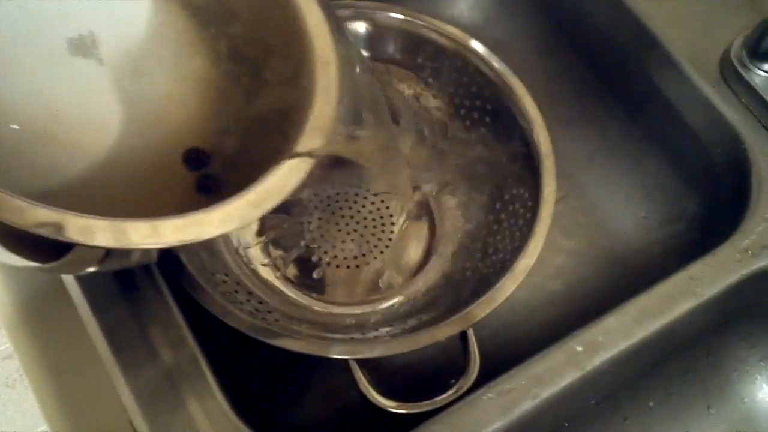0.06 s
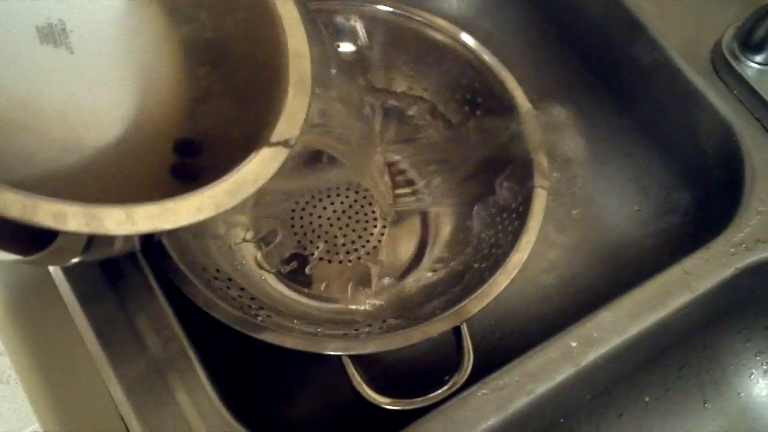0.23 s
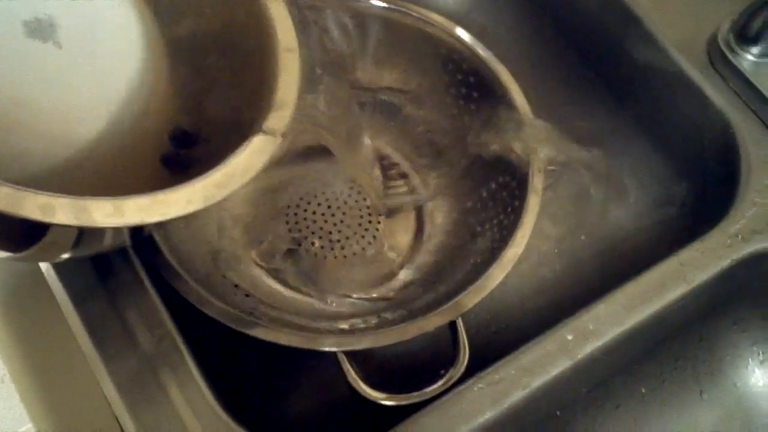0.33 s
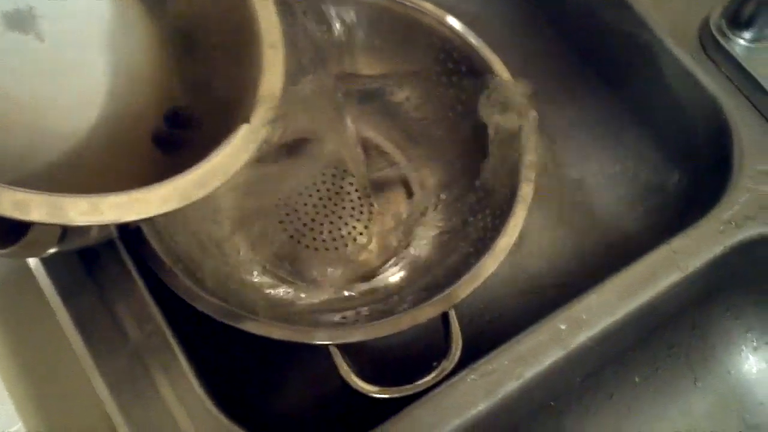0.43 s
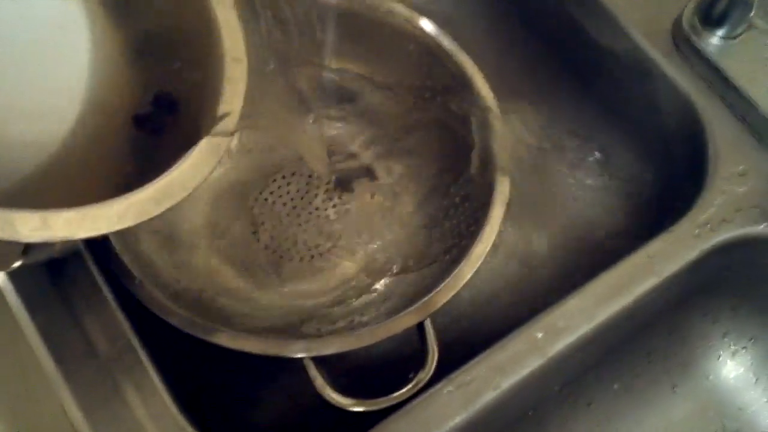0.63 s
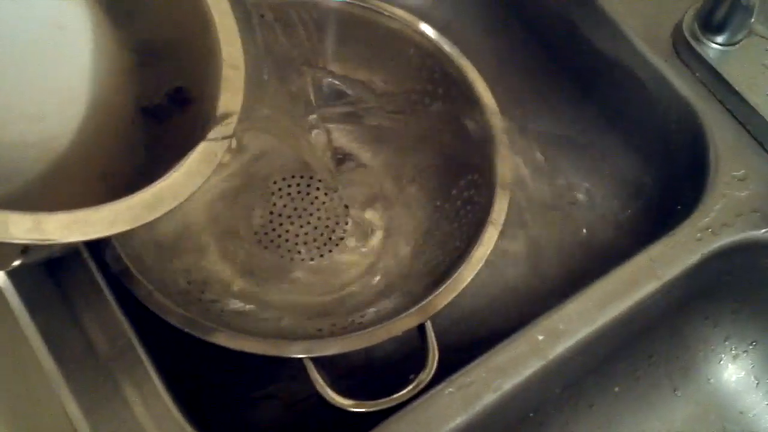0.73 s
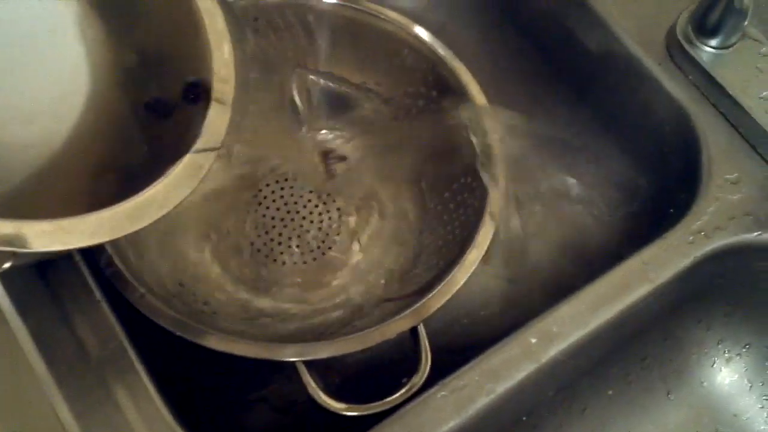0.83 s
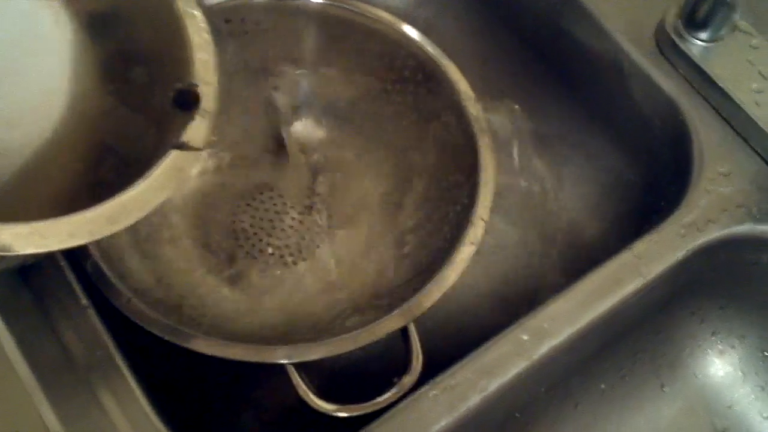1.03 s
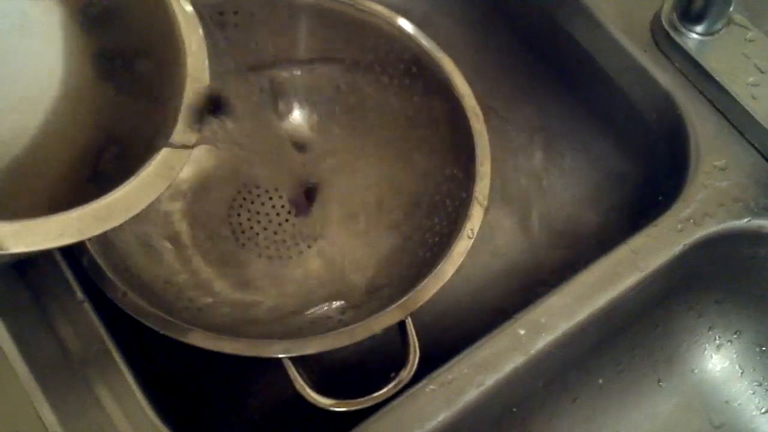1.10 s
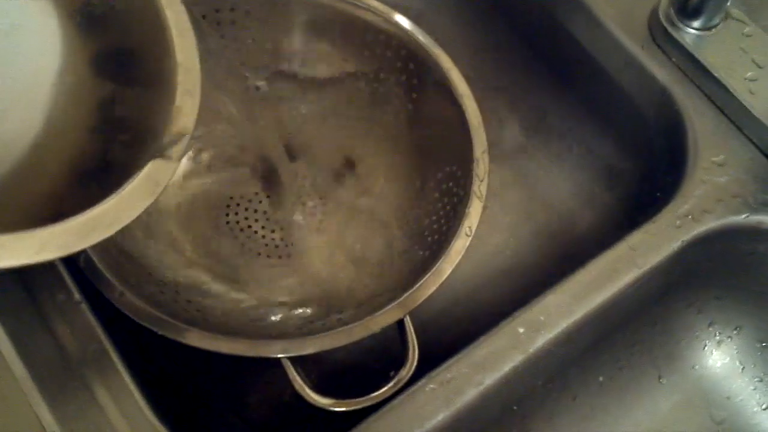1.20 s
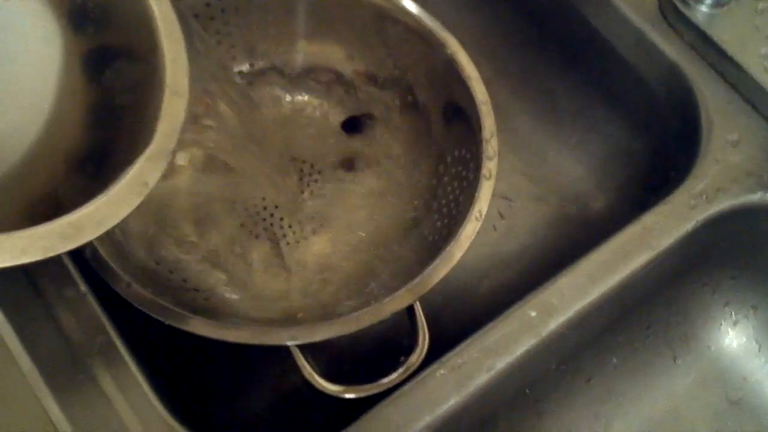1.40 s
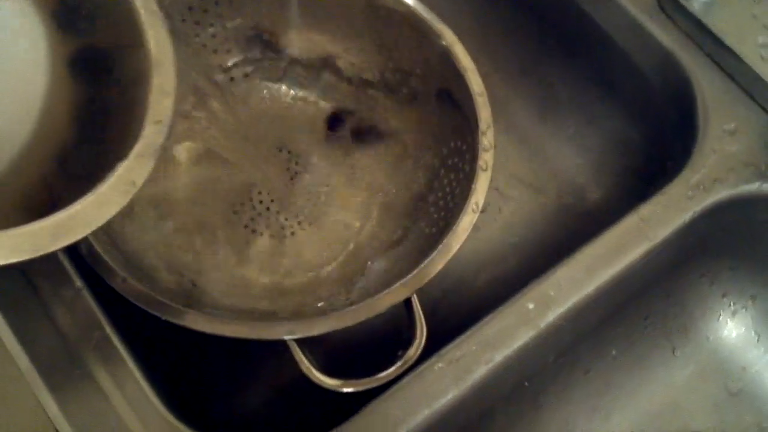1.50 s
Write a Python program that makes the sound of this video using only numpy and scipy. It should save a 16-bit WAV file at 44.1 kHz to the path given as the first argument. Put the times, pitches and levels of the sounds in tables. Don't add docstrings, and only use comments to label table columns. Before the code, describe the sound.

Water pours from a bowl into a metal colander in a steel sink, hissing and splashing brightly, then gurgling and drumming lower; two small berries knock the metal late. Close stereo microphone in a kitchen.

```python
import sys
import numpy as np
from scipy import signal
from scipy.fft import rfft, irfft, next_fast_len
from scipy.io import wavfile

SR = 44100
rng = np.random.default_rng(int(sys.argv[2]) if len(sys.argv) > 2 else 0)


def wav_record(signal):
    frames = np.transpose(np.atleast_2d(signal))
    bounded = np.clip(frames, -1, 1)
    quanta = np.round(bounded * 32767).astype(np.int16)
    wavfile.write(sys.argv[1], SR, quanta)


def to_linear_factor(level_db):
    exponent = np.asarray(level_db, float) / 20
    return 10 ** exponent


N = 68355
TIME_S = np.arange(N) / SR


def rms_one(x):
    return x / np.sqrt(np.mean(x ** 2) + 1e-20)


def at_hz(points, hz, axis=1):
    p = np.array(points)
    return np.interp(np.log(hz), np.log(p[:, 0]), p[:, axis])


def butter(x, order, hz, kind):
    return signal.sosfilt(signal.butter(order, hz, kind, fs=SR, output="sos"), x)


def drift(rate_hz):
    pole = np.exp(-80 * np.pi * rate_hz / SR)
    noise = rng.standard_normal(N // 40 + 2002)
    slow = signal.lfilter([1], [1, -2 * pole, pole * pole], noise)[2000:]
    return np.interp(np.arange(N) / 40, np.arange(len(slow)), rms_one(slow))


def ring(clicks, hz, t60_s):
    radius = to_linear_factor(-60 / (max(t60_s, 1e-4) * SR))
    w = 2 * np.pi * hz / SR
    return signal.lfilter([0, np.sin(w)], [1, -2 * radius * np.cos(w), radius * radius], clicks + 1e-18)


def shape(start_s, rise_s, t60_s):
    t = np.maximum(TIME_S - start_s + rise_s, 0)
    return t, (1 - np.exp(-t / rise_s)) * to_linear_factor(-60 * t / max(t60_s, .005))


def hiss(spectrum, patchy_db, shared_db, rate_hz):
    out, together = 0, drift(rate_hz)
    lowest, highest = spectrum[0][0], spectrum[-1][0]
    edges = lowest * 2 ** np.arange(0, np.log2(highest / lowest) + .3, 1 / 3)
    white = rng.standard_normal((2, 2, N))
    for k, (low, high) in enumerate(zip(edges, edges[1:])):
        band = butter(white[k % 2], 2, [low, high], "band")
        level_db = at_hz(spectrum, np.sqrt(low * high))
        out = out + band * to_linear_factor(level_db + shared_db * together + patchy_db * drift(rate_hz))
    return rms_one(out)


def grains(spectrum, low_hz, high_hz, per_s, cycles):
    spread_db = 3.0
    sizes = to_linear_factor(spread_db * np.minimum(rng.exponential(1, N), 4)) * rng.choice([-1, 1], (2, N))
    born = rng.random(N) < per_s * to_linear_factor(5 * drift(15)) / SR
    dealt = rng.integers(0, 24, N)
    out = 0
    for k, hz in enumerate(np.geomspace(low_hz, high_hz, 24)):
        gain = to_linear_factor(at_hz(spectrum, hz)) * hz
        out = out + gain * ring(sizes * born * (dealt == k), hz, cycles / hz)
    return rms_one(out)


def struck(rows, level_db, rise_s, t60_s):
    out = 0
    for s, db, hz in rows:
        t, envelope = shape(s, rise_s, t60_s)
        phase = 2 * np.pi * hz * t
        out = out + to_linear_factor(db + level_db) * envelope * np.array([np.sin(phase), np.cos(phase)])
    return out


def rumble():
    # pitch_hz, density_db_per_hz
    rumble_colour = [(30, -33), (70, 5.5), (110, 15), (170, 2), (300, -25)]
    return to_linear_factor(-48.5) * hiss(rumble_colour, patchy_db=1.5, shared_db=-1.5, rate_hz=3.3)


def trickle():
    # pitch_hz, density_db_per_hz
    trickle_colour = [(450, 3.5), (1200, -8), (2500, -11.5), (6000, -5.5)]
    return to_linear_factor(-56) * hiss(trickle_colour, patchy_db=3.5, shared_db=1.5, rate_hz=12.0)


def berry(contacts, modes):
    contact_hz, lag_cycles = 2870, .6
    crack_db, crack_hz, crack_rise_s, crack_t60_s = -32.5, 1790, 0.0013, 0.16
    clicks = np.zeros(N)
    s, db = np.transpose(contacts)
    clicks[(s * SR).astype(int)] = to_linear_factor(db)
    pole = np.exp(-2 * np.pi * contact_hz / SR)
    clicks = signal.lfilter([1 - pole], [1, -pole], clicks)
    rings = 0
    for k, (hz, mode_db, t60_s) in enumerate(modes):
        late = np.roll(clicks, int(lag_cycles * SR / hz))
        rings = rings + to_linear_factor(mode_db) * ring(late, hz, t60_s) * np.array([[1], [(-1) ** k]])
    dull = rms_one(butter(rng.standard_normal((2, N)), 1, crack_hz, "low"))
    crack = sum(to_linear_factor(d) * shape(t, crack_rise_s, crack_t60_s)[1] for t, d in contacts)
    return rings + dull * to_linear_factor(crack_db) * crack


def knocks():
    # start_s, level_db
    first_contacts = [
        (1.0746, -3),
        (1.0771, -6.5),
        (1.0825, -16.5),
        (1.115, -23.5),
    ]
    second_contacts = [
        (1.2306, -9.5),
        (1.2331, -5.5),
        (1.2545, -27),
        (1.268, -20),
    ]
    # pitch_hz, level_db, t60_s
    first_modes = [(211, -8, 0.048), (344.8, -16, 0.15), (368.6, -14.5, 0.11), (449, -23.5, 0.085),
                   (627, -13.5, 0.085), (803, -21, 0.034), (968, -23, 0.17), (1125, -22.5, 0.05),
                   (1222, -14.5, 0.033), (1486, -23, 0.06), (1768, -21, 0.078), (2013, -34, 0.033),
                   (2594, -11.5, 0.02), (4300, -46, 0.0065)]
    second_modes = [(210, -13.5, 0.073), (362.2, -13.5, 0.14), (380, -18, 0.092), (480, -29.5, 0.18),
                    (513, -17, 0.09), (692, -19.5, 0.099), (840, -30.5, 0.076), (1164, -24, 0.069),
                    (1236, -20, 0.047), (1472, -17.5, 0.034), (1700, -23, 0.025), (2200, -17, 0.014),
                    (2870, -57, 0.016), (5200, -18, 0.014)]
    both = berry(first_contacts, first_modes) + berry(second_contacts, second_modes)
    return butter(both, 2, 170, "high")


def thumps():
    # start_s, peak_db, pitch_hz
    slugs = [(.242, -56, 393), (.305, -47, 372), (.352, -41, 362), (.4, -41.5, 304), (.443, -38.5, 380.5),
             (.496, -39.5, 361), (.585, -42, 323), (.66, -37, 165), (.77, -37, 167), (.95, -36.5, 331.4),
             (.965, -40.5, 586), (.986, -33, 343), (1.125, -48, 333), (1.165, -29.5, 361.3),
             (1.195, -41.5, 345), (1.258, -38.5, 530), (1.29, -36.5, 366.4), (1.35, -36, 322),
             (1.405, -38.5, 352), (1.45, -41.5, 334), (1.496, -35, 339)]
    return struck(slugs, level_db=6.5, rise_s=0.0087, t60_s=0.14)


def ticks():
    # start_s, peak_db, pitch_hz
    droplets = [(.0764, -41, 7400), (.1082, -39, 8000), (.156, -34, 7470), (.169, -31, 7860),
                (.2052, -34, 7300), (.2125, -39, 7100), (.217, -32, 7060), (.2237, -26.5, 7100),
                (.2266, -28, 7400), (.2352, -32, 7000), (.2627, -29.5, 4500), (.2795, -29, 7470),
                (.3365, -30.5, 7400), (.3745, -32, 6900), (.4116, -29, 7200), (.4165, -30, 4700),
                (.4812, -20, 7900), (.484, -21, 7600), (.5591, -33, 6570), (.604, -30, 7840),
                (.6455, -28, 4530), (.6938, -32, 4330), (.7335, -16.5, 8000), (.737, -22, 5200),
                (.7961, -25, 5250), (.809, -27.5, 5100), (.891, -31, 6650), (.968, -30.5, 7200),
                (1.0745, -19, 4250), (1.161, -36, 7060), (1.226, -20, 5320), (1.2994, -35, 4750),
                (1.3204, -33, 10500), (1.3862, -38, 6740), (1.4114, -29, 4800)]
    return struck(droplets, level_db=-3, rise_s=.0004, t60_s=.007)


def bubbles():
    level_db, rise_s, glide_per_s, roughness = -7.5, 0.003266, 0.89, .55
    # start_s, peak_db, pitch_hz, t60_s
    air_pockets = [(0.254, -39.5, 1540, 0.047), (0.314, -28.5, 2500, 0.035), (.371, -37, 1936, 0.068),
                   (.456, -35.5, 2200, 0.1), (.491, -38, 2200, 0.062), (0.533, -32.5, 1700, 0.062),
                   (.655, -31, 1950, 0.022), (0.708, -34, 1450, 0.056), (0.734, -35, 1604, 0.14),
                   (0.721, -35, 165, 0.55), (1.505, -27.5, 160, 0.25), (.78, -31, 563, 0.087),
                   (0.826, -39.5, 1100, 0.22), (.846, -33.5, 1780, 0.061), (0.875, -28.5, 1026, 0.14),
                   (.939, -35.5, 1815, 0.22), (0.986, -22.5, 1606, 0.056)]
    out, shake = 0, 1 + roughness * (drift(84) + 1j * drift(120))
    for s, db, hz, t60_s in air_pockets:
        t, envelope = shape(s, rise_s, t60_s)
        tone = shake * np.exp(2j * np.pi * hz * (t + glide_per_s * t * t / 2))
        out = out + to_linear_factor(db + level_db) * envelope * np.array([tone.real, tone.imag])
    return out


def splashes():
    level_db, rise_per_t60 = -17.5, .022
    # start_s, peak_db, centre_hz, t60_s, half_width_octaves
    slaps = [(0.077, -23, 8800, 0.16, 0.097), (.11, -29, 13300, 0.16, 0.35),
             (.18, -27.5, 5020, 0.24, 0.098), (0.208, -19.5, 7100, 0.3, 0.34),
             (0.224, -20.5, 6830, 0.047, 0.34), (0.279, -18, 8350, 0.044, 0.91),
             (0.332, -18, 6400, 0.093, 0.25), (0.411, -12, 5750, 0.076, 0.25), (.482, -16, 8000, .05, .3),
             (.604, -21.5, 5900, 0.3, 0.13), (0.646, -15.5, 5200, 0.085, 0.25),
             (0.693, -20.5, 4850, 0.12, 0.19), (0.731, -8, 5800, 0.11, 0.34),
             (0.732, -19.5, 2200, 0.089, 0.18), (0.757, -12.5, 7200, 0.057, 0.44),
             (0.807, -15, 5700, 0.058, 0.12), (0.887, -16, 5300, 0.16, 0.63),
             (.967, -18.5, 9000, 0.34, 0.45), (1.035, -15, 7700, 0.064, 0.29),
             (1.0745, -10, 5760, 0.057, 0.62), (1.159, -22, 6650, 0.2, 0.57),
             (1.224, -17.5, 5100, 0.11, 0.74), (1.273, -20, 5200, 0.058, 0.17),
             (1.321, -26, 11700, 0.11, 0.13)]
    out, white = 0, rng.standard_normal((2, N))
    for s, db, hz, t60_s, octaves in slaps:
        edges = np.clip(hz * 2 ** (max(octaves, .05) * np.array([-1, 1])), 500, 19000)
        band = rms_one(butter(white, 2, edges, "band"))
        out = out + to_linear_factor(db + level_db) * shape(s, rise_per_t60 * t60_s, t60_s)[1] * band
    return out


def basin():
    # pitch_hz, level_db, t60_s
    basin_modes = [(165, -7.5, 0.11), (226, -12, 0.36), (327, -7.5, 0.051), (336, 1.5, 0.16),
                   (395, 0.5, 0.066), (546, -6, 0.019), (666, -11.5, 0.16), (1036, -20, 0.23)]
    stream = rng.standard_normal((2, N)) * to_linear_factor(drift(14.0))
    out = 0
    for k, (hz, db, t60_s) in enumerate(basin_modes):
        out = out + to_linear_factor(db) * rms_one(ring(stream, hz, t60_s)) * (-1) ** k
    return rms_one(out)


def gurgle():
    # pitch_hz, density_db_per_hz
    gurgle_colour = [(120, 1.5), (200, 7), (300, 1.5), (600, -1.5), (1000, -12.5), (1400, -9), (2000, -8),
                     (3000, -23.5)]
    churn = hiss(gurgle_colour, patchy_db=0.0, shared_db=2.5, rate_hz=19.5)
    fizz = grains(gurgle_colour, 527, 3400, per_s=190, cycles=11.5)
    return to_linear_factor(-3) * churn + to_linear_factor(-13) * fizz


def spray():
    # pitch_hz, density_db_per_hz
    spray_colour = [(1500, -25), (3000, 3.5), (4200, -3.5), (5200, 1.5), (8000, 2.5), (9500, 2),
                    (12000, -10.5), (16000, -8)]
    mist = hiss(spray_colour, patchy_db=3.0, shared_db=0.6, rate_hz=78.0)
    drops = grains(spray_colour, 3556, 14000, per_s=1600, cycles=45)
    return to_linear_factor(-4) * mist + to_linear_factor(-9) * drops


def pour():
    # time_s, spray_db, drum_db, gurgle_db
    flow = [(0.0, -48, -51, -58.5), (.09, -50.5, -57, -57), (0.17, -44.5, -58, -52),
            (.23, -45.5, -54.5, -61), (0.296, -37.5, -54, -46.5), (0.418, -39, -50, -50),
            (.52, -39, -55.5, -43.5), (.62, -38, -51, -46), (0.72, -36.5, -61, -46), (.79, -35, -61.5, -44),
            (.85, -35, -53, -45), (0.914, -36, -51, -42), (0.996, -34.5, -54.5, -42.5),
            (1.06, -39, -45.5, -41), (1.17, -41, -38, -39.5), (1.3, -43, -43, -39), (1.41, -42, -48, -45.5),
            (1.55, -42, -59, -50)]
    # centre_s, level_db, width_s
    lulls = [
        (1.062, 0.5, 0.034),
        (1.217, -7.5, 0.013),
    ]
    s, *columns = np.transpose(flow)
    spray_db, drum_db, gurgle_db = (np.interp(TIME_S, s, c) for c in columns)
    water = to_linear_factor(spray_db) * spray() + to_linear_factor(gurgle_db) * gurgle() + to_linear_factor(drum_db + 2) * basin()
    lull_db = sum(db * np.exp(-((TIME_S - t) / width_s) ** 2) for t, db, width_s in lulls)
    return water * to_linear_factor(lull_db)


def ports(pair):
    # pitch_hz, difference_over_sum_db, likeness (-1..1)
    port_spread = [(79, -23, -0.17), (237, -9, -0.7), (336, -14, 1), (643, -9.5, 0.92), (1100, 0.5, 1),
                   (2200, 2.5, 0.074), (5100, -3.5, 0.23), (6600, 2, -0.14), (8000, -3, 0.34),
                   (11000, -0.4, 0.089), (13000, 0, 0.19)]
    size = next_fast_len(N + 4096)
    hz = np.maximum(np.arange(size // 2 + 1) * SR / size, 1)
    a, b = rfft(pair, size)
    alike = np.clip(at_hz(port_spread, hz, axis=2), -.95, .95)
    side = irfft(to_linear_factor(at_hz(port_spread, hz)) * (alike * a + np.sqrt(1 - alike ** 2) * b), size)[:N]
    return np.array([pair[0] + side, pair[0] - side])


def scene():
    berries = knocks()
    background = rumble() + trickle()
    hits = ticks() + thumps()
    lean = np.diff(berries[0], prepend=0) * np.array([[1], [-1]])
    return ports(pour() + splashes() + bubbles() + hits + berries + background) + lean


def low_pass(x):
    return signal.sosfilt(signal.butter(12, 15900, fs=SR, output="sos"), x)


def record(dry):
    low_cut_hz, lag_samples = 171, 15
    x = butter(dry, 2, low_cut_hz, "high")
    crossed = np.pad(x[::-1], ((0, 0), (lag_samples, 0)))[:, :N]
    return low_pass(x - crossed)


dry = scene()
out = record(dry)
wav_record(out)
```